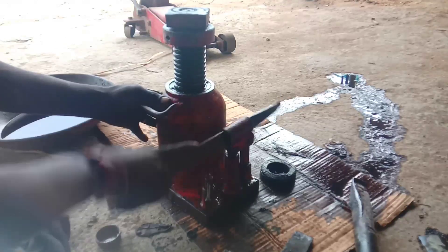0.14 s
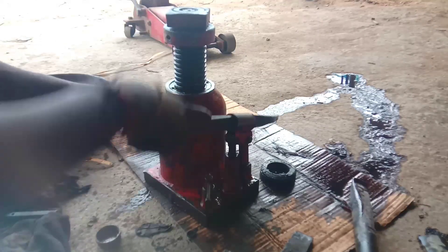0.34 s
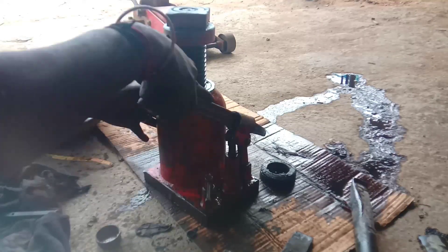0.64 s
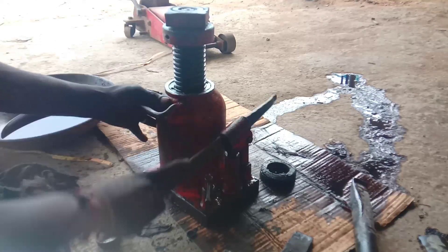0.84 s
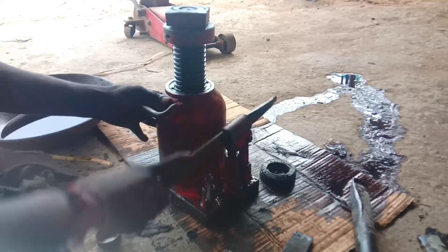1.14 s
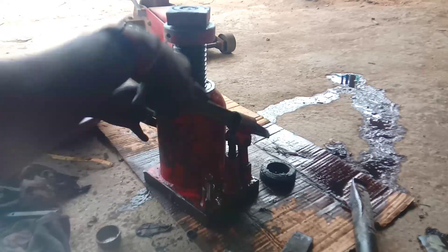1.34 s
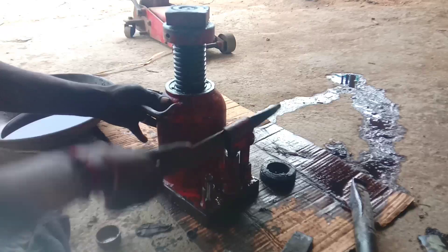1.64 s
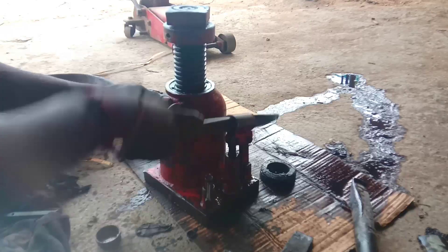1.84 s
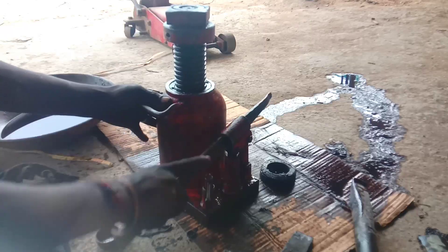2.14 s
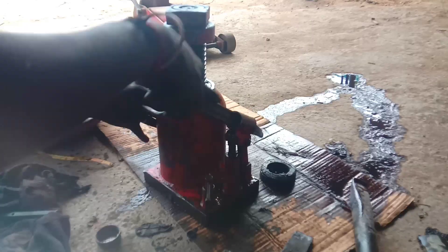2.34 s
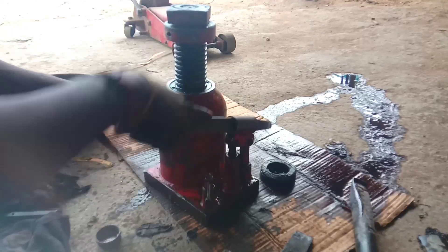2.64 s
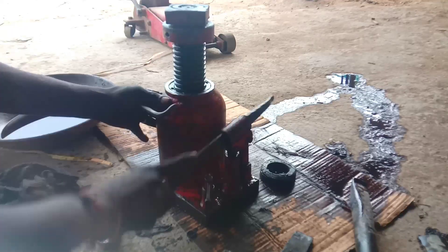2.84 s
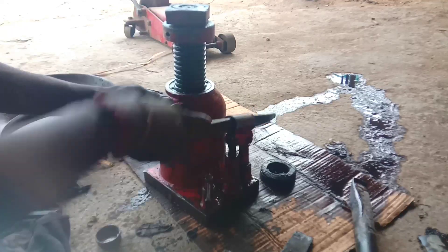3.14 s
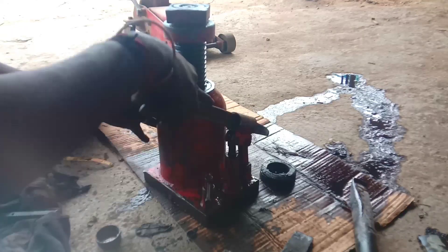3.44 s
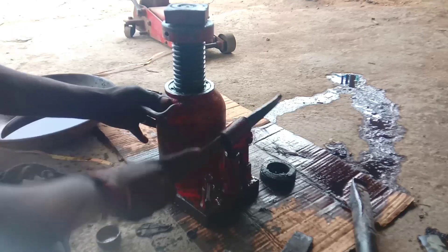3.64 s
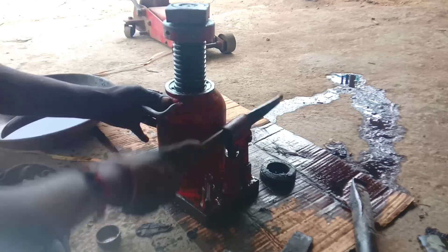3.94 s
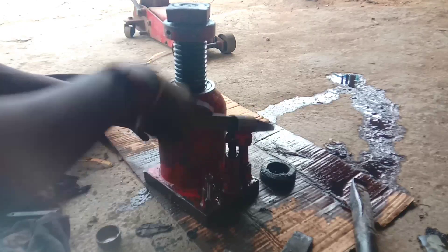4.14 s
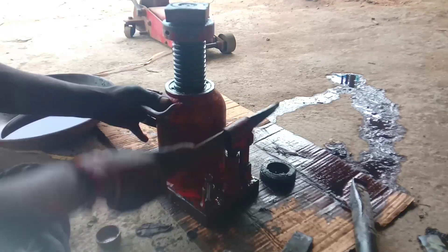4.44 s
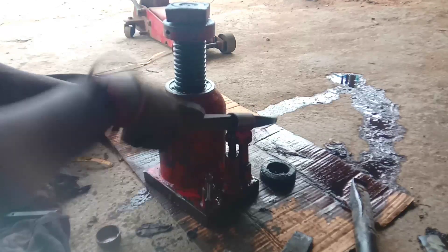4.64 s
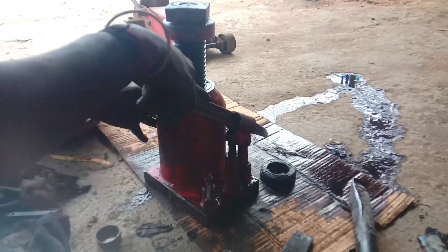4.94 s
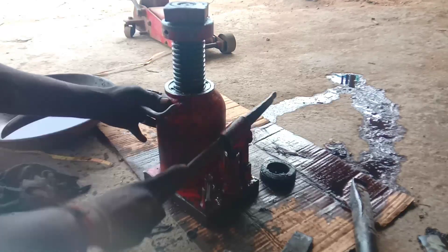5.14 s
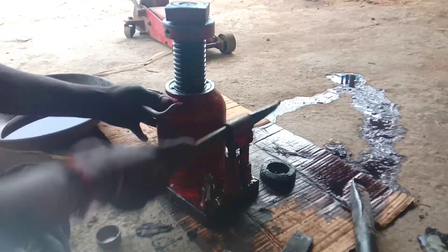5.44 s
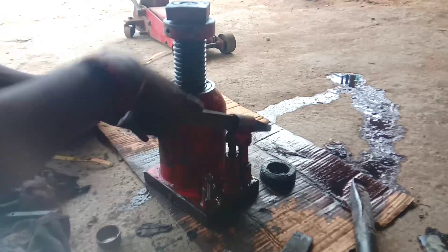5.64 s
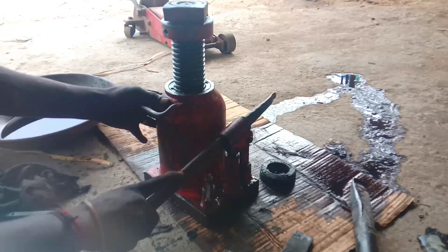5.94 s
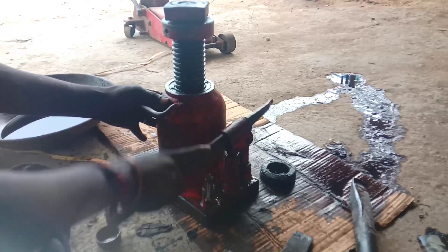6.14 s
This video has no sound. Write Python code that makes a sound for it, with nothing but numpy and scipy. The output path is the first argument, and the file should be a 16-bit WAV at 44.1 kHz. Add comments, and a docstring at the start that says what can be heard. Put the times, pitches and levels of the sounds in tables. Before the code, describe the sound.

Quick, even metallic clacks of a hand-pumped jack lever, with bright clinks and loose jingles, in an open workshop with low hum behind.

```python
"""An open workshop with a yard beyond: a steel bottle jack is pumped by a loose lever, close to a phone.
At the bottom of each stroke the link pin clinks and the lever lands; at the top it slaps back; loose steel
jingles between. An engine idles away in the distance over rumble, yard noise and two thin tones. Blows are
decaying modes and noise bursts with a workshop tail; the phone's limiter ducks everything round each one."""
import sys
import numpy as np
from scipy import signal
from scipy.fft import rfft, irfft, next_fast_len
from scipy.io import wavfile
from scipy.ndimage import uniform_filter1d, map_coordinates

SR = 44100
rng = np.random.default_rng(int(sys.argv[2]) if len(sys.argv) > 2 else 0)


def dump(signal):
    """Clip the signal to [-1, 1] and save it as 16-bit WAV at the path in sys.argv[1]."""
    limited = np.clip(np.atleast_2d(signal).T, -1, 1)
    pcm = np.round(limited * 32767).astype(np.int16)
    wavfile.write(sys.argv[1], SR, pcm)


N = 276948

# All event levels are peaks of the direct sound ahead of the limiter; spectra are relative.
# far rumble: pitch_hz, level_db (per Hz)
RUMBLE_SPECTRUM = [(13, -49), (22, -26), (87, 6), (137, 2.5), (222, -22.5), (363, -61), (392, -41),
                   (450, -48), (580, -68), (990, -120)]
# swells of the rumble: start_s, level_db
RUMBLE_SWELLS = [(0, -24), (.06, -36), (.8, -34.5), (2, -40), (3.3, -44), (4.25, -46.5), (4.33, -40.5),
                 (4.56, -49.5), (4.65, -34), (4.88, -29.5), (4.98, -40), (5.56, -29.5), (5.74, -48),
                 (5.8, -37.5), (6.28, -37.5)]
# orders of the distant engine: multiple (of ENGINE_HZ), level_db
ENGINE_ORDERS = [(2, 1), (3, 2), (4, 4.5), (5, 0.5), (6, -4), (7, -7), (8, -7), (9, -8.5), (10, -18)]
# the engine draws away: start_s, level_db, brightness_db (below 0: per multiple above the fourth; also moves roar)
ENGINE_FADE = [(0, -42.5, 1.8), (.6, -40, 0), (1.3, -47.5, 0.4), (2.2, -46, -5), (3, -49.5, -3.5),
               (3.8, -54.5, -3), (6.3, -88, 6)]
# far exhaust roar: pitch_hz, level_db (per Hz)
ROAR_SPECTRUM = [(120, -24), (250, -2), (500, -8.5), (1000, -11), (2000, -13.5), (4000, -60)]
# yard noise: pitch_hz, level_db (per Hz)
YARD_SPECTRUM = [(150, 1), (300, -4.5), (600, -17.5), (800, -9.5), (1000, -6.5), (1240, 2.5), (1500, -9),
                 (2200, -10.5), (4000, -16.5), (8000, -19.5), (12000, -47), (15300, -34)]
# faint thin tones: pitch_hz, level_db, waver_hz
THIN_TONES = [(1169, -55, 3), (1275, -57, 14)]
# decay of the workshop's tail: pitch_hz, t60_s
SHOP_DECAY = [(500, 0.33), (2500, 0.3), (6000, 0.32), (10000, 0.29), (15500, 0.23)]
# crack of steel on steel: pitch_hz, level_db (per Hz)
CRACK_SPECTRUM = [(820, -50), (1400, -25.5), (1790, -19.5), (2420, -1), (3470, -10), (4270, -7.5),
                  (7150, -11), (9550, -17.5), (11700, -29.5), (15400, -17.5), (16500, -28.5)]
# thud of the base on cardboard: pitch_hz, level_db (per Hz)
THUD_SPECTRUM = [(250, -63), (500, 3.5), (800, 11), (1300, 7.5), (2000, -14)]
# small ticks of the linkage: start_s, level_db
TICK_TIMES = [(0.046, -19), (0.789, -21), (1.008, -19), (1.1444, -28), (2.311, -25), (2.448, -13.5),
              (2.4689, -12.5), (2.669, -22), (2.847, -15), (3.06, -17), (3.21, -35), (3.437, -19),
              (3.952, -29), (3.809, -15), (4.304, -22.5), (4.321, -17), (4.332, -17), (4.711, -30),
              (4.929, -31), (5.088, -36), (6.079, -24)]
# loose steel touching: start_s, level_db, ring_share (of the free ring time)
JINGLE_TOUCHES = [(2.0226, -22, 0.53), (2.0884, -15.5, 1.2), (2.2215, -16.5, 0.31), (2.833, -10, 0.37),
                  (3.5903, -9.5, 0.66), (4.719, -21, 0.6), (5.101, -29.5, 1.2), (6.044, -18, 1.15),
                  (6.237, -20, 0.35)]
# modes of the loose steel: pitch_hz, level_db, t60_s
JINGLE_MODES = [(2840, -16, 0.2), (4090, -3, 0.11), (5194, -3.5, 0.19), (6500, -8, 0.09), (7150, -16, 0.12),
                (7300, -3, 0.21), (8920, -12, 0.2), (9440, -6, 0.1), (10880, -20, 0.08), (11600, -18, 0.15),
                (13020, -20, .1), (14080, -15, 0.1), (15320, -7, 0.15)]
# pin taking up its play: start_s, level_db
PIN_CLINKS = [(0.248, -3), (0.6172, -7), (0.9886, -7.5), (1.359, -8.5), (1.729, -4.5), (2.2817, -21),
              (2.678, -3), (3.0463, -9.5), (3.4156, -10), (3.7883, -6.5), (4.1668, -5.5), (4.5403, -10.5),
              (4.918, -13.5), (5.2991, -5), (5.674, -11.5), (6.251, -25.5)]
# modes of the pin: pitch_hz, level_db, t60_s
CLINK_MODES = [(2067, -11.5, 0.06), (2613, -2.5, 0.054), (2849, 2, 0.062), (3186, -5.5, 0.046),
               (3914, 7, 0.045), (5170, -5, 0.1), (6540, -5.5, 0.049), (7860, -22, 0.06)]
# modes of lever and jack: pitch_hz
LEVER_PITCHES = [1270, 1900, 2200, 2467, 2620, 2840, 3905, 5176, 7306, 9460, 11510, 13400]
# one row for each of those pitches: bottom_db, top_db, middle_db (by where it is struck), t60_s
LEVER_MODES = [(-20, -20, -32, .06), (-18, -18, -20, .04), (-9, -18, -16, .08), (0, 0, 0, .16),
               (-7, -2, -14, .22), (-10, 19, -16, .22), (-18, 17, -28, .25), (-22, -12, -32, .1),
               (-30, -20, -40, .1), (-38, -24, -46, .12), (-46, -36, -50, .12), (-42, -26, -50, .12)]
# duller knocks as the lever shifts in its socket: start_s, level_db, ring_db, lowest_mode_lift_db, thud_db
SOCKET_KNOCKS = [(0.382, -15, -9, 34, -17), (1.4882, -22, 5, 21, -35), (1.8602, -6, -7, 27, -14),
                 (2.804, -12, -4.5, 39, -14.5), (3.1755, -17, -7, 36.5, -35),
                 (3.5498, -16.5, -5.5, 29.5, -16), (4.3116, -16.5, -8.5, 30, -20.5),
                 (4.9867, -29, -5, 25, -10), (5.0605, -22, -10, 40, -11), (5.7989, -11, -4.5, 33.5, -10.5),
                 (5.9206, -29.5, -28, 30, -18), (6.0951, -17, -28, 24, -4)]
# lever landing at the bottom of the stroke: start_s, level_db, ring_db
LANDINGS = [(0.27, 1.5, -24), (0.6434, -0.5, -17), (1.0131, 0.5, -17), (1.3818, -2, -15.5),
            (1.7522, 0, -12), (2.3206, -6.5, -12.5), (2.7, -3.5, -11.5), (3.071, -5, -18.5),
            (3.443, -4.5, -27), (3.8132, -4.5, -19), (4.1894, -0.5, -29), (4.565, -1.5, -13),
            (4.945, -2.5, -7), (5.3253, 0.5, -17), (5.6979, -3, -16), (6.0891, -10, -22)]
# lever slapping back at the top: start_s, level_db, ring_db, singing_modes_lift_db
SLAPS = [(0.0635, -3.5, -15.5, -41), (0.4331, -3, -23, -23.5), (0.8035, 0.5, -21.5, -24),
         (1.176, 0, -22, -25), (1.5431, -1.5, -22.5, -20), (2.096, 1, -25.5, -26), (2.4902, 2, -23.5, -30),
         (2.8678, 3.5, -42, -18), (3.2272, -3, -25, -32), (3.6023, 3, -20, -24.5), (3.9793, -3, -19, -30),
         (4.3513, -6, -25, -23), (4.729, 3, -20, -28), (5.1092, -4.5, -24, -14), (5.1142, 2, -22, -13),
         (5.487, -0.5, -23.5, -31)]
# shared by all landings: thud_db, sheen_db, chatter_s, rebound_db
LANDING_CONTACT = (-15, -3.5, 0.004, -28)
# shared by all slaps: thud_db, sheen_db, chatter_s, rebound_db
SLAP_CONTACT = (-21.5, 0, 0.004, -15.5)

ENGINE_HZ = 40.22
YARD_DB, YARD_FALLS_DB_PER_S = -42.5, 1.05
YARD_OPENS_DB, YARD_OPENS_S = 7, 0.47  # louder start and its fading time
BLOW_SIZE = SR // 6  # samples
LEAD_S, REBOUND_S = 0.007, 0.019  # scrape ahead of contact, last tick after it
SHEEN_GROWS = 0.1  # dB of sheen lost for each dB softer
TICK_SHEEN_DB, JINGLE_SHEEN_DB = -7, 3  # sheen of a 0 dB touch
SHIFT_SHEEN_DB, SHIFT_CHATTER_S, SHIFT_REBOUND_DB = -32, 0.002, -30
ROCK_DB, WALL_SHEEN_DB = 6.5, -1.5  # rocking over the thud; extra treble loss at the walls
CEILING_DB, FIRM = -11, 0.66  # limiter threshold and the share removed above it
DUCK_DB_PER_S, RECOVER_DB_PER_S = 240, 75.3
EDGE_HZ, TOP_HZ = 15600, 16660  # the two treble steps


def amp(db):
    """Decibels to linear amplitude."""
    return 10 ** (np.asarray(db) / 20)


def unit(x):
    """Scales x to rms 1."""
    return x / np.sqrt(np.mean(x ** 2) + 1e-20)


def along(points, hz):
    """Reads (pitch_hz, value) points on a log pitch axis."""
    pitch, value = np.transpose(points)
    return np.interp(np.log(hz + 1), np.log(pitch + 1), value)


def curves(rows):
    """One value per sample for each column after start_s."""
    start_s, *columns = np.transpose(rows)
    return [np.interp(np.arange(N) / SR, start_s, column) for column in columns]


def wobble(rate):
    """A smooth random curve, rate knots a second."""
    coarse = np.arange(0, N + 64, 64)
    knots = rng.standard_normal(int(N * rate / SR) + 4)
    return np.interp(np.arange(N), coarse, map_coordinates(knots, [coarse * rate / SR]))


def filtered(x, response):
    """Applies a response of frequency to x."""
    size = next_fast_len(x.shape[-1] + 4096)
    spectrum = rfft(x, size) * response(np.fft.rfftfreq(size, 1 / SR))
    return irfft(spectrum, size)[..., :x.shape[-1]]


def noise(spectrum, size):
    """Coloured noise of rms 1."""
    return unit(filtered(rng.standard_normal(size), lambda hz: amp(along(spectrum, hz))))


def rumble():
    """Low noise made lumpy by a random swell."""
    level_db, = curves(RUMBLE_SWELLS)
    return amp(level_db) * unit(amp(1.5 * wobble(8.3)) * noise(RUMBLE_SPECTRUM, N))


def engine():
    """A distant engine: multiples of an unsteady turning rate, plus exhaust roar, dying away."""
    level_db, brightness_db = curves(ENGINE_FADE)
    turn = 2 * np.pi * np.cumsum(ENGINE_HZ * (1 + 0.00396 * wobble(3.19))) / SR
    sound = amp(-5 + 4.8 * brightness_db + 4.33 * wobble(7.85)) * noise(ROAR_SPECTRUM, N)
    for multiple, db in ENGINE_ORDERS:
        dulling_db = np.minimum(brightness_db, 0) * max(multiple - 4, 0)
        order_level = amp(db + dulling_db + 2.93 * wobble(7.3))
        sound += order_level * np.sin(multiple * turn + 7 * rng.random())
    return amp(level_db) * sound


def yard():
    """Yard noise, louder at the start and sinking steadily."""
    t = np.arange(N) / SR
    level_db = YARD_DB - YARD_FALLS_DB_PER_S * t + YARD_OPENS_DB * np.exp(-t / YARD_OPENS_S)
    return amp(level_db + 2.0 * wobble(17)) * noise(YARD_SPECTRUM, N)


def thin_tones():
    """Two faint sines wavering in pitch and level."""
    track = np.zeros(N)
    for pitch_hz, level_db, waver_hz in THIN_TONES:
        phase = 2 * np.pi * np.cumsum(pitch_hz + waver_hz * wobble(15)) / SR
        track += amp(level_db + 2 * wobble(4)) * np.sin(phase)
    return track


def ring(hz, db, t60, scatter_db, rough):
    """Decaying modes at new strengths for every blow; loose joints shake their phases."""
    t = np.arange(BLOW_SIZE)[:, None] / SR
    db = db + scatter_db * rng.standard_normal(len(hz))
    walk = np.cumsum(rng.standard_normal((len(t) // 64 + 1, len(hz))), axis=0)
    shake = uniform_filter1d(walk.repeat(64, axis=0)[:len(t)], size=64, axis=0)
    phase = 2 * np.pi * hz * t + rough * (shake - shake[0])
    modes = amp(db - 60 * t / t60) * np.sin(phase)
    return modes.sum(axis=1) * (1 - np.exp(-t[:, 0] / 0.00019))


def puff(spectrum, t60, rise):
    """A burst of noise that dies at once."""
    t = np.arange(4096) / SR
    burst = noise(spectrum, len(t)) * amp(-60 * t / t60) * (1 - np.exp(-t / rise))
    return np.pad(burst, (0, BLOW_SIZE - len(t)))


def sheen(x, db):
    """Shifts the treble from 6.5 kHz, fully an octave up: hard contacts are brighter."""
    return filtered(x, lambda hz: amp(db * np.clip(np.log2((hz + 1) / 6500), 0, 1)))


def spread(spectrum, burst):
    """A burst as the walls receive it from all sides: the same energy with a smooth spectrum."""
    impulse = signal.unit_impulse(len(burst), round(LEAD_S * SR))
    click = filtered(impulse, lambda hz: amp(along(spectrum, hz)))
    return click * np.linalg.norm(burst) / np.linalg.norm(click)


def workshop_tail():
    """Noise bands that build up briefly and decay each at its own rate, as reflections do."""
    t = np.arange(SR // 4) / SR
    pitch_hz, t60_s = np.transpose(SHOP_DECAY)

    def band_shapes(hz):
        return [np.interp(np.log(hz + 1), np.log(pitch_hz), row) for row in np.eye(len(pitch_hz))]

    bands = filtered(rng.standard_normal(len(t)), band_shapes)
    tail = (bands * amp(-60 * t / t60_s[:, None])).sum(axis=0) * np.clip(t / 0.031, 0, 1)
    return amp(-10.5) * tail / np.linalg.norm(tail)


def add(track, start_s, level_db, near, walls):
    """Places one contact, its direct sound at its peak level, with its own workshop tail."""
    heard = signal.fftconvolve(walls, workshop_tail())
    heard[:len(near)] += near
    part = track[round(start_s * SR):][:len(heard)]
    part += amp(level_db) / np.abs(near).max() * heard[:len(part)]
    return track


def ticks():
    """Play in the linkage: small dry contacts."""
    track = np.zeros(N)
    for start_s, level_db in TICK_TIMES:
        tick = sheen(puff(CRACK_SPECTRUM, 0.019, 0.0006), TICK_SHEEN_DB + SHEEN_GROWS * level_db)
        add(track, start_s, level_db, tick, spread(CRACK_SPECTRUM, tick))
    return track


def jingle():
    """Thin steel parts touch and sing on until something damps them; harder touches are brighter."""
    track = np.zeros(N)
    hz, mode_db, t60 = np.transpose(JINGLE_MODES)
    for start_s, level_db, ring_share in JINGLE_TOUCHES:
        steel = ring(hz, mode_db, t60 * ring_share, scatter_db=4, rough=0.32)
        steel += 0.55 * puff(CRACK_SPECTRUM, 0.027, 0.0006)
        steel = sheen(steel, JINGLE_SHEEN_DB + SHEEN_GROWS * level_db)
        add(track, start_s, level_db, steel, steel)
    return track


def pin():
    """The link pin takes up its play with a short bright clink: modes and a crack."""
    track = np.zeros(N)
    for start_s, level_db in PIN_CLINKS:
        clink = ring(*np.transpose(CLINK_MODES), scatter_db=2.0, rough=0.07)
        crack = 0.69 * puff(CRACK_SPECTRUM, 0.068, 0.00028)
        add(track, start_s, level_db, clink + crack, 0.51 * clink + spread(CRACK_SPECTRUM, crack))
    return track


def chatter(x, seconds, rebound_db):
    """Steel scrapes in, bounces in quick succession and ticks once more as the lever settles."""
    hits = np.zeros(SR // 25)
    lead = round(LEAD_S * SR)
    hits[rng.integers(lead, size=8)] = amp(-30.0 + 9.2 * rng.standard_normal(8))  # scrape
    bounces = (seconds * SR * rng.random(5)).astype(int)
    hits[lead + bounces] = amp(-8 * rng.random(5))
    hits[lead] = 0.48  # first contact
    hits[lead + round(REBOUND_S * SR)] = amp(rebound_db)
    return signal.fftconvolve(x, hits)[:len(x)]


def push(hz):
    """One soft low swing: the whole jack rocks on its base."""
    u = np.arange(BLOW_SIZE) / SR * hz
    return u * (1 - u) * np.exp(-2.5 * u) * 9


def blow(start_s, level_db, modes_db, thud_db, sheen_db, chatter_s, rebound_db, rocks=False):
    """One blow of the lever: crack, ring and thud, with rocking if the jack is shifted."""
    t60 = np.transpose(LEVER_MODES)[3]
    steel = ring(np.array(LEVER_PITCHES), modes_db, t60, scatter_db=2.5, rough=0.22)
    crack = 0.91 * puff(CRACK_SPECTRUM, 0.02, 0.00049)
    thud = amp(thud_db) * puff(THUD_SPECTRUM, 0.028, 0.0014)
    rock = rocks * amp(thud_db + ROCK_DB) * push(hz=367)
    # ring and rocking wait for the contact; the scrape comes ahead of it
    late = np.pad(steel + rock, (round(LEAD_S * SR), 0))[:len(steel)]
    near = 1.3 * late + chatter(sheen(crack, sheen_db) + thud, chatter_s, rebound_db)
    wall_crack = sheen(spread(CRACK_SPECTRUM, crack) + 0.47 * crack, sheen_db + WALL_SHEEN_DB)
    walls = 1.34 * (late + wall_crack + spread(THUD_SPECTRUM, thud))
    return add(np.zeros(N), start_s - LEAD_S, level_db, near, walls)


def lever():
    """Rings by where it lands; free at the top it sings with the pin's pitches, knocked sideways it bends."""
    bottom_db, top_db, middle_db, _ = np.transpose(LEVER_MODES)
    singing = np.isin(LEVER_PITCHES, [2840, 3905])
    lowest = np.isin(LEVER_PITCHES, [1270])
    track = np.zeros(N)
    for start_s, level_db, ring_db in LANDINGS:
        track += blow(start_s, level_db, bottom_db + ring_db, *LANDING_CONTACT)
    for start_s, level_db, ring_db, lift_db in SLAPS:
        track += blow(start_s, level_db, top_db + ring_db + lift_db * singing, *SLAP_CONTACT)
    for start_s, level_db, ring_db, lift_db, thud_db in SOCKET_KNOCKS:
        modes_db = middle_db + ring_db + lift_db * lowest
        track += blow(start_s, level_db, modes_db, thud_db,
                      SHIFT_SHEEN_DB, SHIFT_CHATTER_S, SHIFT_REBOUND_DB, rocks=True)
    return track


def scene():
    """Far sounds to near ones; one microphone feeds both channels."""
    distance = rumble() + engine() + yard() + thin_tones()
    jack = ticks() + jingle() + pin() + lever()
    return np.tile(distance + jack, (2, 1))


def record(dry):
    """The limiter looks ahead, ducks fast and recovers slowly; deep bass is cut, treble ends in two steps."""
    t = np.arange(N) / SR
    level_db = 20 * np.log10(np.abs(dry[0]) + 1e-9)
    need_db = np.minimum(0, FIRM * (CEILING_DB - level_db))
    recovery, ducking = RECOVER_DB_PER_S * t, DUCK_DB_PER_S * t
    after = np.minimum.accumulate(need_db - recovery) + recovery
    before = np.minimum.accumulate((need_db + ducking)[::-1])[::-1] - ducking
    gain_db = uniform_filter1d(np.minimum(before, after), size=200)

    def step(hz, edge_hz):
        return np.clip((hz - edge_hz) / 400 + 0.5, 0, 1) ** 2

    def microphone(hz):
        treble = amp(-26 * step(hz, EDGE_HZ) - 70 * step(hz, TOP_HZ))
        return treble * hz ** 2 / (hz ** 2 + 45 ** 2)

    return filtered(dry * amp(gain_db), microphone)


dry = scene()
out = record(dry)
dump(out)
```